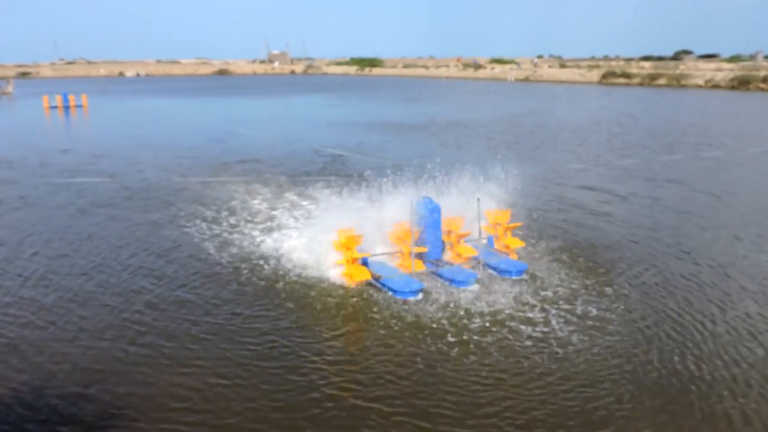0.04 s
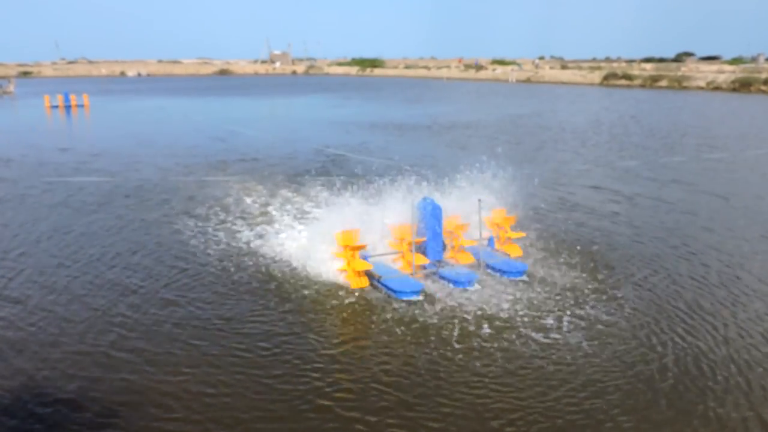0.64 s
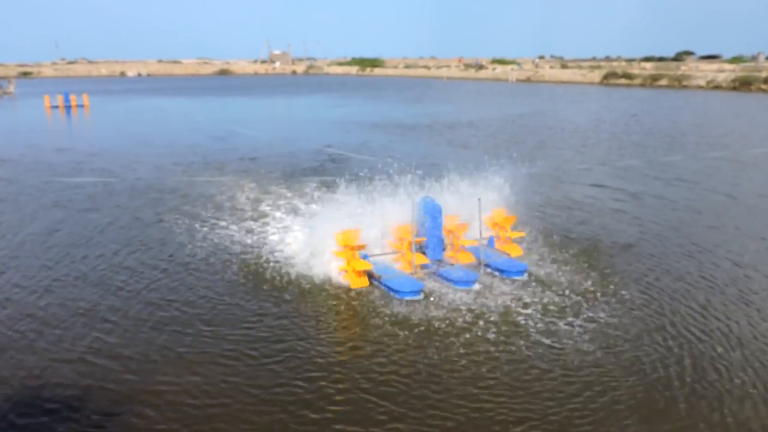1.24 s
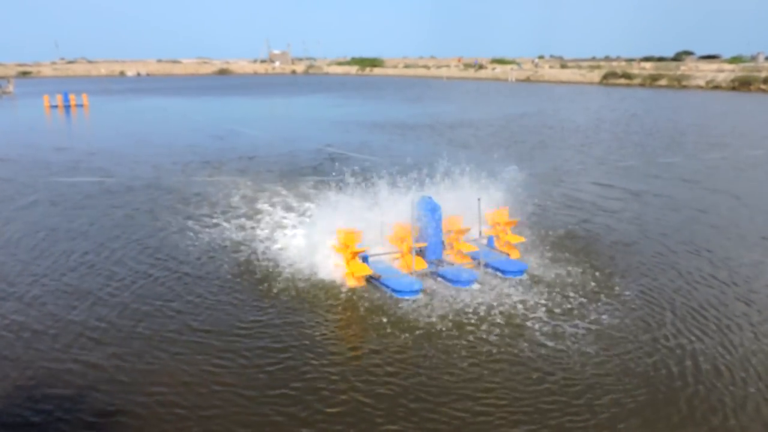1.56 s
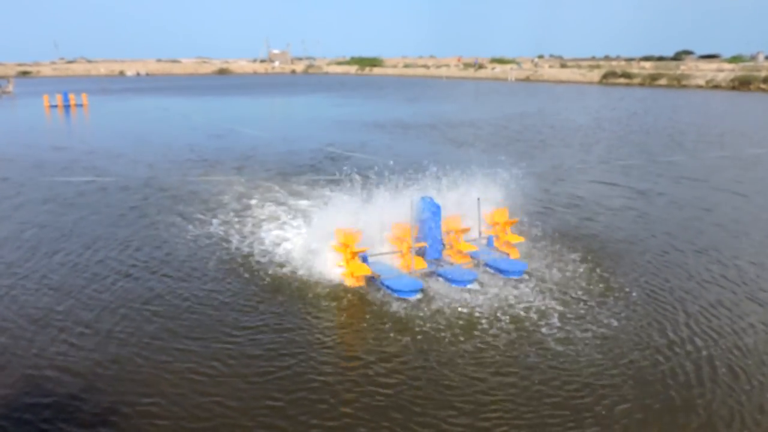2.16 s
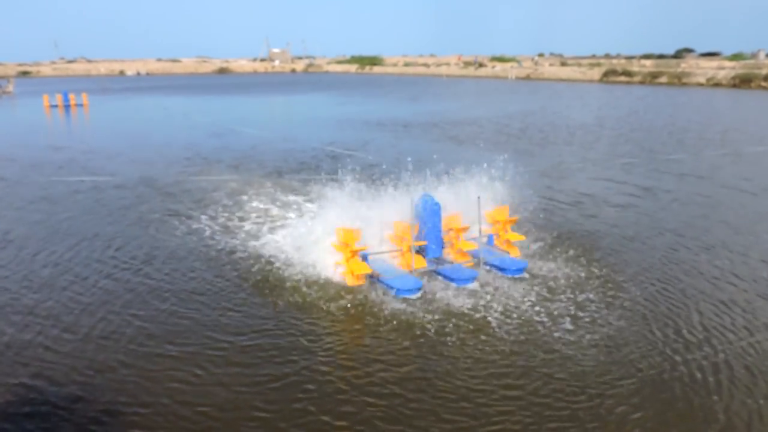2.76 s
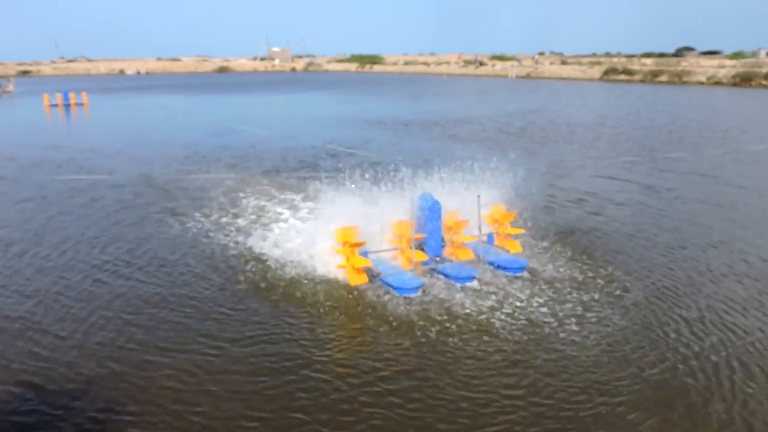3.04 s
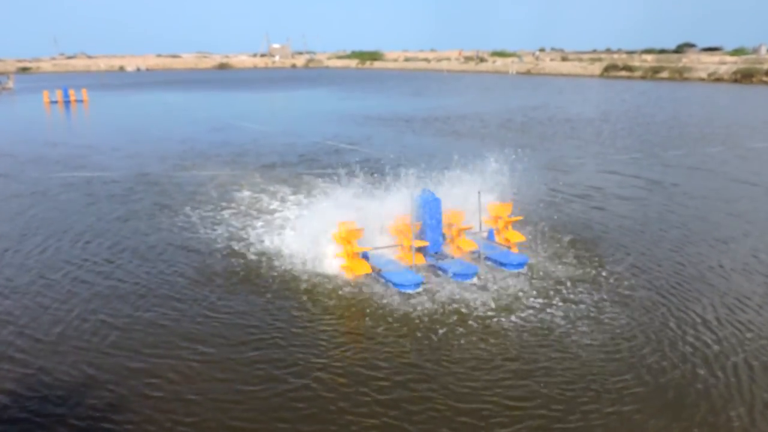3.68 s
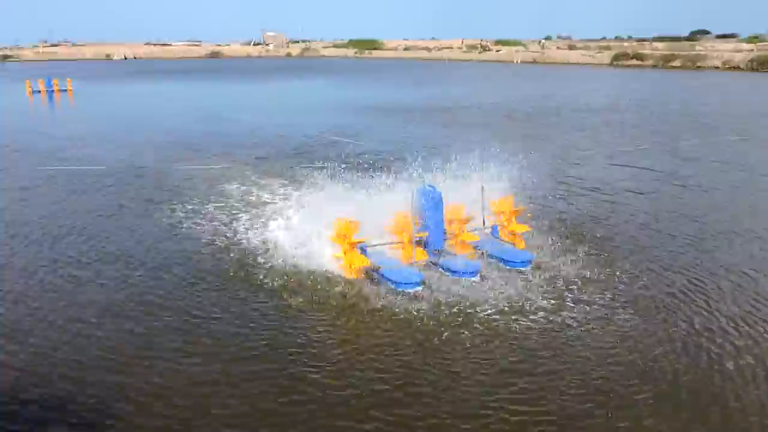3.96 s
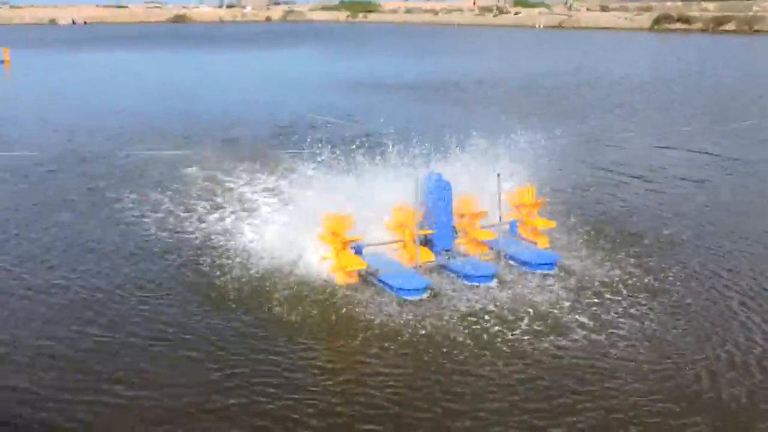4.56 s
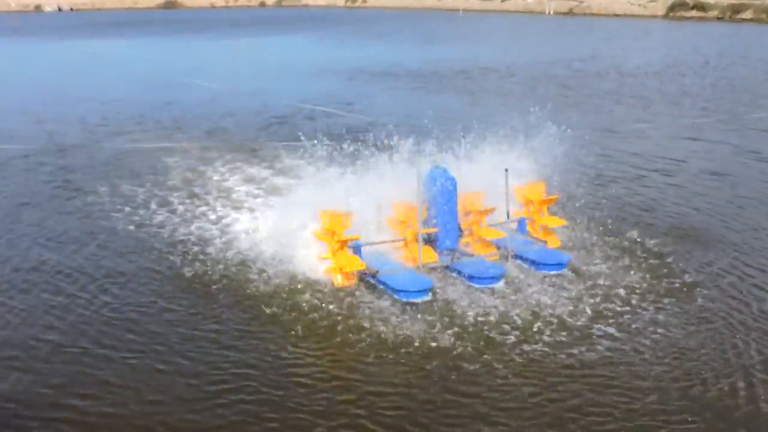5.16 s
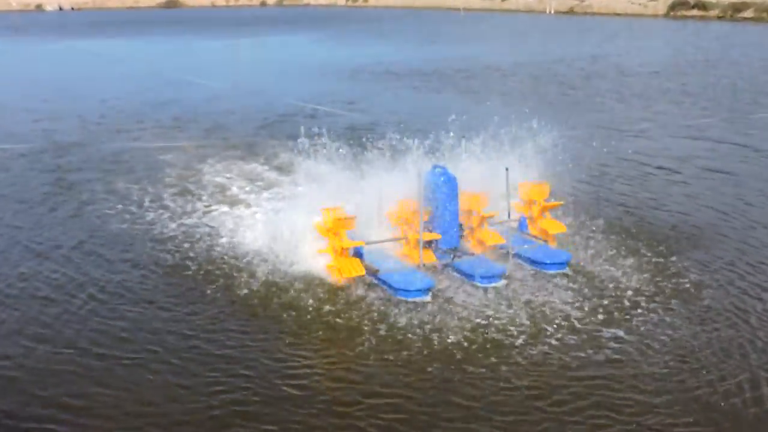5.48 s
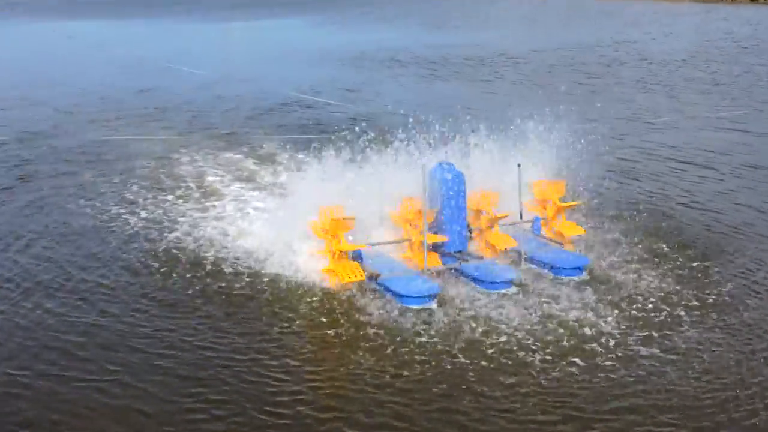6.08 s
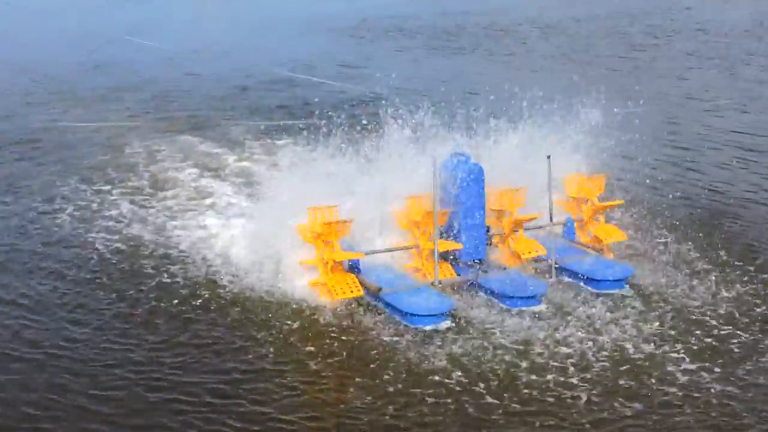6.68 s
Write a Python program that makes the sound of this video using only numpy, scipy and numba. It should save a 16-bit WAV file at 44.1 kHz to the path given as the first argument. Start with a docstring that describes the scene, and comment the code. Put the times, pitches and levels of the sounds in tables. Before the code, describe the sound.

A paddlewheel aerator churns an open pond some metres away, making a steady rush of splashing, bubbles and fine spray with a faint gear whine. Much louder gusts of wind rumble and thump on the phone microphone, mostly on the left. The buffeting starts almost at once and returns in ragged bursts, with the splashing dipping under the thumps and recovering in the lulls.

```python
"""An open pond, heard from a phone on a windy bank while a paddlewheel aerator churns some metres away.
Its blades throw up sheets of water that fall back as drop impacts, ringing bubbles and fine spray;
the meshing teeth of its gearbox whine faintly. Turbulent gusts rumble and thump on the two microphone
ports, mostly the left; the machine's sound ducks at the thumps and recovers between them."""
import sys
import numpy as np
from scipy import signal
from scipy.fft import rfft, irfft
from scipy.io import wavfile
from scipy.ndimage import uniform_filter1d
from numba import njit

SR = 44100
rng = np.random.default_rng(int(sys.argv[2]) if len(sys.argv) > 2 else 0)


def file_out(sig):
    """Save sig as 16-bit WAV at sys.argv[1]."""
    # one column per channel
    cols = np.atleast_2d(sig).T
    # limit, then scale
    lim = np.clip(cols, -1, 1)
    pcm = np.round(lim * 32767).astype(np.int16)
    wavfile.write(sys.argv[1], SR, pcm)


N = 305172


def undb(db):
    """Amplitude grows tenfold for every 20 dB."""
    return 10 ** (np.asarray(db) / 20)


def unit(x):
    """Normalisation to an rms of 1."""
    return x / np.sqrt(np.mean(x ** 2))


def over_time(points):
    """Linear interpolation of (time_s, value) points at every sample."""
    time_s, value = np.transpose(points)
    return np.interp(np.arange(N) / SR, time_s, value)


def over_bins(points):
    """Interpolation of (frequency_hz, value) points at every bin, on a log-frequency axis."""
    hz, value = np.transpose(points)
    return np.interp(np.log(np.arange(N // 2 + 1) * SR / N + 1), np.log(hz), value)


def colour(x, points):
    """Spectral shaping by (frequency_hz, gain_db) points, at rms 1."""
    return unit(irfft(rfft(x) * undb(over_bins(points)), N))


def drift(per_s):
    """A smooth random process of rms 1 that changes about per_s times a second."""
    step = max(int(SR / per_s), 2)
    stairs = np.repeat(rng.standard_normal(N // step + 1), step)
    return unit(uniform_filter1d(stairs, step)[:N])


@njit
def lowpass(x, hz, damping):
    """A damped second-order system with a moving corner: the state-variable low-pass."""
    y, band_state, low_state = np.empty(len(x)), 0., 0.
    for i in range(len(x)):
        g = np.tan(np.pi * hz[i] / SR)
        band = (band_state + g * (x[i] - low_state)) / (1 + g * (g + damping))
        y[i] = low_state + g * band
        band_state, low_state = 2 * band - band_state, 2 * y[i] - low_state
    return y


def impacts(per_s, spread_db):
    """Shot noise: drops strike independently, as impulses of very unequal size."""
    hit = rng.random(N) < per_s / SR
    size = undb(spread_db * np.minimum(rng.exponential(size=N), 5))
    return unit(hit * size * rng.standard_normal(N))


def bubbles(count, low_hz, high_hz, cycles, spread_db, glide):
    """Bubble resonance: trapped air rings as a damped oscillator, rising in pitch near the surface."""
    out = np.zeros(N + SR)
    for when, pitch, life, chance in rng.random((count, 4)):
        hz = low_hz * (high_hz / low_hz) ** pitch
        ring_s = cycles * (.5 + life) / hz
        t = np.arange(int(min(ring_s, .5) * SR)) / SR
        ring = np.sin(2 * np.pi * hz * t * (1 + glide * t / ring_s / 2))
        decay = np.exp(-np.log(100) * t / ring_s)
        start = int(when * N)
        out[start:start + len(t)] += ring * decay * undb(spread_db * np.log(max(chance, .01)))
    return unit(out[:N])


def churn():
    """Impact and air entrainment: falling sheets of water rush, slap, froth and plop."""
    # spectrum of the splash: frequency_hz, gain_db
    splash_spectrum = [(60, 7), (230, 8), (300, 9), (380, 0), (440, -1), (700, 3), (960, 4), (1150, -1),
                       (1300, 0.2), (1400, 1.6), (1620, -0.5), (1740, -1.5), (1815, -0.5), (1900, -3),
                       (2115, 0), (2330, -5), (2750, -3), (3030, -8), (3400, -7), (4400, -15.5),
                       (9000, -27)]
    rush = rng.standard_normal(N)
    drops = impacts(per_s=2200, spread_db=1.5)
    froth = bubbles(count=5000, low_hz=640.6, high_hz=3555, cycles=22, spread_db=1.5, glide=0.26)
    plops = bubbles(count=130, low_hz=704, high_hz=2600, cycles=24, spread_db=4.5, glide=0.19)
    splash = colour(undb(-1.5) * rush + undb(-7) * drops, splash_spectrum)
    return splash + undb(-11.5) * froth + undb(-16) * plops


def mist():
    """Dense shot noise: fine spray patters on the pond and merges into a hiss."""
    # spectrum of the spray: frequency_hz, gain_db
    spray_spectrum = [(2500, -4), (4500, -0.5), (6800, 2.5), (8500, 1), (10500, 0), (13000, 1.5),
                      (15800, 0.5)]
    hiss = undb(0.5) * rng.standard_normal(N)
    return colour(hiss + impacts(per_s=5300, spread_db=2), spray_spectrum)


def at_ports(source, left_lag_s=1.8e-5):
    """Partial coherence: a wide patch of water gives both ports the same bass but differing treble."""
    # likeness of the two ports: frequency_hz, correlation
    coherence = [(100, 1), (700, 0.99), (1400, 0.91), (3000, 0.71), (6800, 0.71), (10000, 0.32),
                 (15000, .1)]
    # side to which the water leans: frequency_hz, left_minus_right_db
    lean = [(300, 1), (1300, 1.5), (2400, 0.8), (4400, -0.5), (8000, -0.6), (15000, -4)]
    correlation = np.clip(over_bins(coherence), 0, .999)
    mid = rfft(source()) * np.sqrt(1 + correlation)
    side = rfft(source()) * np.sqrt(1 - correlation)
    sign = np.array([[1], [-1]])  # left, right
    delay = np.exp(-1j * np.pi * sign * left_lag_s * np.arange(N // 2 + 1) * SR / N)
    return unit(irfft((mid + sign * side) * delay * undb(sign * over_bins(lean) / 2), N))


def paddles(blade_hz=18, stroke_db=0.57, shower_db=0.76, slop_db=0.79):
    """Amplitude modulation: each blade throws a little more water, and no two throws are alike."""
    # slow changes in the amount of fine spray: time_s, gain_db
    spray_gain = [(.15, -9), (.9, -7.5), (1.6, -8), (2.7, -9), (3.55, -8), (4.4, -8), (4.97, -8), (5.6, -8),
                  (6.4, -8), (6.8, -7)]
    blade_turns = np.cumsum(blade_hz * (1 + 0.026 * drift(4.66))) / SR
    throw_db = stroke_db * np.sin(2 * np.pi * blade_turns)
    body = at_ports(churn) * undb(5.5 + throw_db + slop_db * drift(70))
    # the spray comes down in its own uneven showers
    spray = at_ports(mist) * undb(1.2 + over_time(spray_gain) + throw_db + shower_db * drift(28))
    return body + spray


def gearbox(waver=0.001995, flutter_db=2.5, wobble_turns=0.049, sideband_db=-3.5, hum_db=-6, ring_db=-4):
    """Gear mesh: teeth whine over a hum at half their rate, and their rattle resonates in the housing."""
    # mesh tone with a sideband one shaft rate to either side: lower_hz, mesh_hz, upper_hz
    tones_hz = [582.8, 606.1, 629.4]
    # strength of the mesh tone: time_s, gain_db
    mesh_gain = [(0, -1.5), (2.5, -3.5), (3.5, -3), (3.85, 3.5), (4.4, -1), (4.95, -2), (5.4, 1), (6.0, -2),
                 (6.35, -2), (6.75, 3)]
    motor_s = np.cumsum(1 + waver * drift(10)) / SR  # time warped by the uneven motor speed
    whine = 0
    for hz, is_mesh in zip(tones_hz, (False, True, False)):
        # a quarter cycle between mesh tone and sidebands: the speed sways more than the loudness
        turns = hz * motor_s + (0.25 if is_mesh else 0) + wobble_turns * drift(7)
        db = over_time(mesh_gain) if is_mesh else sideband_db
        whine += undb(db + flutter_db * drift(8.2)) * np.sin(2 * np.pi * turns)
    hum = undb(hum_db + flutter_db * drift(7.5)) * np.sin(np.pi * tones_hz[1] * motor_s)
    # response of the housing: frequency_hz, gain_db
    resonance = [(300, -41), (520, -7.5), (600, -7.0), (640, -3), (720, -7.5), (1200, -57)]
    housing = colour(rng.standard_normal(N), resonance)
    return whine + hum + undb(ring_db) * housing


def airflow(port, breeze_db=-43, breeze_hz=100, rise_db_per_s=261, fall_db_per_s=194, octaves_per_db=0.1):
    """Incoherent gusts add in power over a light breeze; gives level (dB) and eddy rate (Hz) at a port."""
    # gusts at full strength: start_s, hold_s, left_db, right_db, eddy_hz
    gusts = [(0.164, 0.079, -21, -25.5, 66), (0.31, 0.019, -37, -24, 173), (0.465, 0.014, -16, -28, 175),
             (0.53, 0.063, -21, -21, 193), (0.59, 0.073, -20, -28.5, 223), (0.68, 0.085, -21.5, -35, 235),
             (0.787, 0.085, -28, -35.5, 235), (0.896, 0.038, -33, -47, 148), (1.017, .025, -39, -44, 80),
             (1.199, 0.0056, -26, -38, 114), (1.294, 0.025, -23.5, -33, 170), (1.372, 0.064, -21, -32, 188),
             (1.505, 0.028, -24, -22, 85.5), (1.576, 0.034, -27.5, -30, 105), (1.65, 0.11, -21, -29, 120),
             (1.847, 0.0055, -22.5, -42, 93), (1.944, 0.021, -31, -40, 110), (2.055, 0.02, -27, -43, 118),
             (2.12, 0.0045, -27, -33, 120), (2.199, 0.021, -23.5, -41, 156), (2.29, .01, -25.5, -34, 121),
             (2.336, 0.074, -24, -32, 145), (2.451, 0.014, -23.5, -37, 140), (2.5, 0.01, -25, -35, 48),
             (2.554, 0.025, -22.5, -36, 134), (2.643, 0.022, -23.5, -24.5, 120),
             (2.735, 0.03, -21.5, -30.5, 106), (2.829, 0.078, -23, -34, 87),
             (2.934, 0.049, -24.5, -38, 110), (3.026, 0.047, -27.5, -41, 90), (3.248, 0.2, -32, -36.5, 81),
             (3.542, 0.16, -22, -30, 66), (3.765, 0.042, -27, -50, 94), (4.026, 0.082, -20, -26.5, 115),
             (4.13, 0.079, -22.5, -46, 150), (4.255, 0.011, -22, -41, 63), (4.41, 0.095, -45, -36, 84),
             (4.64, 0.16, -34, -37, 106), (4.973, 0.059, -18, -25.5, 137), (5.077, 0.082, -22, -23, 136),
             (5.229, 0.1, -27, -31, 120), (5.388, 0.085, -29.5, -56, 81), (5.684, 0.12, -30.5, -28, 89.5),
             (5.965, 0.052, -25.5, -37, 127), (6.1, 0.062, -23, -30.5, 128), (6.287, 0.017, -32, -40, 85.5),
             (6.604, 0.22, -49, -38, 84), (6.79, 0.027, -29, -41, 50), (6.85, 0.044, -38, -24.5, 120)]
    t = np.arange(N) / SR
    power = np.full(N, undb(breeze_db) ** 2)
    weighted_hz = power * breeze_hz
    for start_s, hold_s, left_db, right_db, eddy_hz in gusts:
        fade_db = -rise_db_per_s * np.maximum(start_s - t, 0)
        fade_db -= fall_db_per_s * np.maximum(t - start_s - hold_s, 0)
        active = fade_db > -60
        db = (left_db if port == "L" else right_db) + fade_db[active]
        # eddies are slower in a dying gust and at the more sheltered port
        local_hz = eddy_hz * 2 ** (octaves_per_db * (db - max(left_db, right_db)))
        power[active] += undb(db) ** 2
        weighted_hz[active] += undb(db) ** 2 * local_hz
    lull_db = -21 * np.exp(-((t - 1.11) / 0.049) ** 6)  # the air is almost still around 1.11 s
    return 10 * np.log10(power) + lull_db, weighted_hz / power


def wind(port, puff_db=1.2, puffs_per_s=30, ragged_db=3, bursts_per_s=110):
    """Turbulent pressure: eddies tumble over a port in ragged bursts, higher in pitch in a faster flow."""
    # port response (the slowest eddies leak past, the smallest cancel across it): frequency_hz, gain_db
    port_response = [(8, -22), (25, -1.6), (60, -3), (110, -0.5), (220, -1.5), (320, 1), (500, -0.5),
                     (1100, -0.5), (3000, -8)]
    level_db, eddy_hz = airflow(port)
    burst = drift(bursts_per_s)
    corner_hz = np.clip(1.88 * eddy_hz * np.exp(0.084 * burst), 30, 3000)
    pressure = lowpass(rng.standard_normal(N) * undb(ragged_db * burst), corner_hz, damping=1.96)
    pressure = lowpass(pressure, np.clip(2.88 * corner_hz, 30, 8000), damping=2.5)
    # a fast flow leaves no time for the largest eddies
    largest = lowpass(pressure, np.clip(0.17 * corner_hz, 5, 500), damping=2.5)
    pressure = colour(pressure - largest, port_response)
    # the gust sets the strength; the eddies only give the grain
    local_power = uniform_filter1d(uniform_filter1d(pressure ** 2, size=1200), size=1200)
    grain = pressure / np.sqrt(local_power + 1e-18)
    return grain * undb(level_db + puff_db * drift(puffs_per_s))


def buffets(port, wake_db=-17, wake_s=0.0071):
    """Vortex suction: a passing low-pressure core pulls sharply at the port amid a short ragged wake."""
    # single hard eddies: centre_s, peak_db, pitch_hz, port
    vortices = [(0.173, -13, 123, "L"), (.19, -10.5, 109, "R"), (0.236, -6, 147, "L"),
                (.344, -23, 200, "R"), (0.469, -5, 266, "L"), (0.479, -3.5, 260, "L"),
                (.485, -10.5, 514, "L"), (0.503, -11, 250, "R"), (.548, -10, 170, "R"),
                (.584, -5.5, 378, "L"), (0.588, -8, 250, "R"), (.611, -8, 398, "L"), (.631, -5, 256, "L"),
                (0.645, -8, 278, "L"), (.658, -7.5, 308, "L"), (.685, -12, 290, "L"), (0.738, -7, 200, "L"),
                (.743, -10, 237, "L"), (0.747, -9.5, 297, "L"), (.769, -15.5, 390, "L"),
                (.813, -11.5, 450, "L"), (0.847, -19, 450, "L"), (.972, -21.5, 190, "L"),
                (1.383, -12, 300, "L"), (1.401, -15, 180, "L"), (1.421, -15, 290, "L"),
                (1.476, -15, 200, "L"), (1.496, -12.5, 230, "L"), (1.667, -13, 200, "L"),
                (1.698, -9.5, 150, "L"), (1.733, -6.5, 200, "L"), (1.743, -5.5, 190, "L"),
                (1.753, -8, 201, "L"), (2.065, -9.5, 197, "L"), (2.075, -9.5, 190, "L"),
                (2.115, -22, 150, "R"), (2.201, -9.5, 263, "L"), (2.338, -12.5, 210, "L"),
                (2.356, -18, 170, "R"), (2.401, -9.5, 223, "L"), (2.416, -13.5, 219, "L"),
                (2.46, -11, 237, "L"), (2.547, -13, 141, "L"), (2.589, -17, 370, "L"),
                (2.652, -15.5, 440, "L"), (2.666, -13, 170, "R"), (2.76, -9.5, 228, "L"),
                (2.85, -4.5, 162, "L"), (2.899, -17, 190, "L"), (3.29, -20, 85, "R"),
                (3.635, -18, 260, "R"), (3.639, -11.5, 129, "L"), (3.665, -14, 100, "L"),
                (4.035, -6.5, 105, "L"), (4.065, -7.5, 218, "L"), (4.107, -9.5, 150, "L"),
                (4.133, -17, 290, "L"), (4.138, -16, 230, "R"), (4.171, -22, 358, "L"),
                (4.196, -14, 280, "L"), (4.259, -14, 85, "L"), (4.31, -17, 228, "L"),
                (4.637, -15.5, 149, "L"), (4.74, -19, 200, "R"), (4.768, -19, 115, "R"),
                (4.969, -5.5, 100, "L"), (5.009, -1, 187, "L"), (5.082, -12, 150, "R"),
                (5.097, -9, 180, "L"), (5.128, -10.5, 210, "L"), (5.171, -14, 300, "L"),
                (5.232, -12, 121, "L"), (5.308, -10.5, 200, "L"), (5.695, -15.5, 100, "R"),
                (5.771, -9, 155, "R"), (6.06, -18, 130, "R"), (6.116, -6, 131, "L"), (6.162, -17, 170, "L"),
                (6.833, -12.5, 115, "L"), (6.865, -12, 110, "R"), (6.902, -12.5, 130, "R")]
    out = np.zeros(N + SR)
    t = np.arange(-2048, 2048) / SR
    for centre_s, peak_db, pitch_hz, side in vortices:
        if side == port:
            distance_squared = (np.pi * pitch_hz * t) ** 2 / 2
            core = (5 * distance_squared - 1) / (1 + distance_squared) ** 4
            wake = unit(signal.fftconvolve(rng.standard_normal(len(t)), core, "same"))
            wake *= np.exp(-(t / wake_s) ** 2 / 2)
            start = int(centre_s * SR) - len(t) // 2
            out[start:start + len(t)] += undb(peak_db) * (core + undb(wake_db) * wake)
    return out[:N]


def scene():
    """Superposition: the machine reaches both ports, while each meets its own turbulence."""
    # level of the machine's sound, ducking at wind thumps and recovering between them: time_s, gain_db
    machine_gain = [(0, -45.5), (.17, -42.5), (.4, -44.5), (.58, -47), (.68, -53.5), (.88, -56), (1.1, -56),
                    (1.42, -48), (1.56, -46), (1.64, -42), (1.77, -49), (2.775, -49), (2.79, -46),
                    (3.2, -46.5), (3.38, -41.5), (3.55, -39), (3.64, -42.5), (3.665, -44.5), (3.87, -45),
                    (4.02, -45), (4.14, -50), (4.58, -49.8), (4.72, -47), (4.83, -44.5), (4.89, -39.5),
                    (4.98, -38), (5.025, -44.5), (5.3, -45.5), (5.7, -42.5), (5.87, -43.5), (6.115, -42.5),
                    (6.135, -47), (6.48, -47.5), (6.79, -38.8), (6.92, -41)]
    machine = (paddles() + undb(-1) * gearbox()) * undb(over_time(machine_gain))
    left = undb(1.28) * wind("L") + buffets("L")
    right = undb(1) * wind("R") + buffets("R")
    return machine + np.array([left, right])


def record(dry):
    """Clipping and band limiting: the phone stops at full scale and cuts the highest treble."""
    top_hz = 15800
    treble_cut = signal.ellip(12, .1, 90, top_hz, fs=SR, output="sos")
    return signal.sosfilt(treble_cut, np.clip(dry, -1, 1))


dry = scene()
out = record(dry)
file_out(out)
```